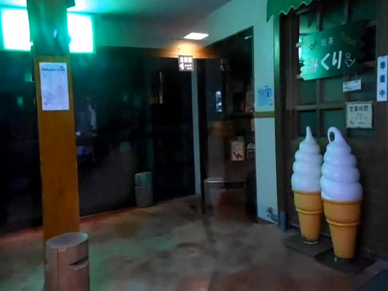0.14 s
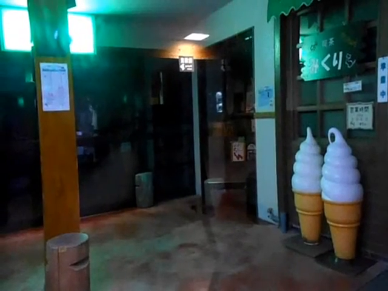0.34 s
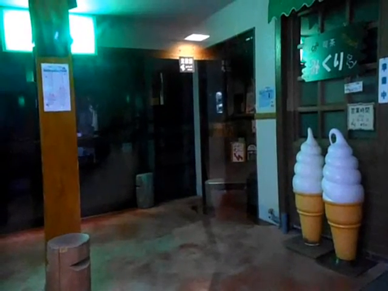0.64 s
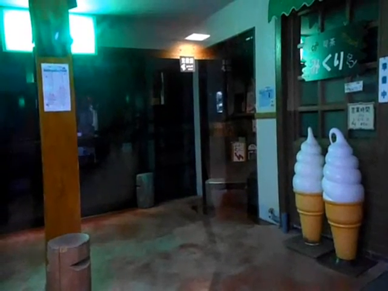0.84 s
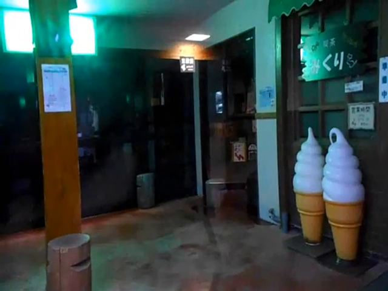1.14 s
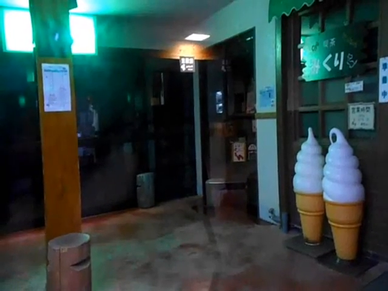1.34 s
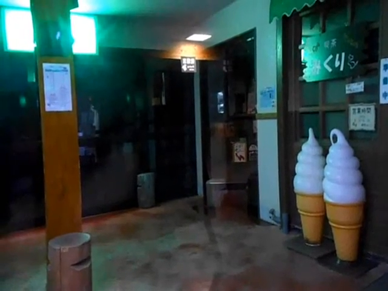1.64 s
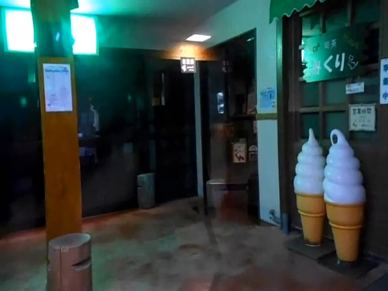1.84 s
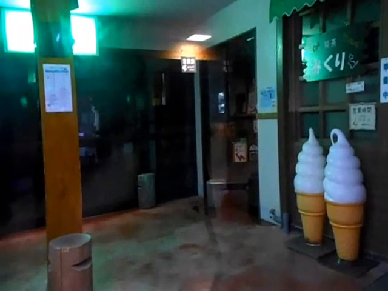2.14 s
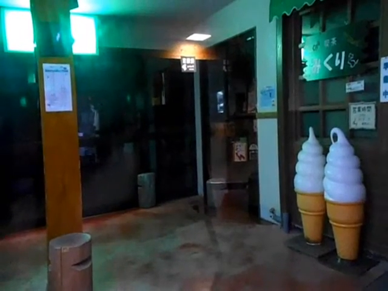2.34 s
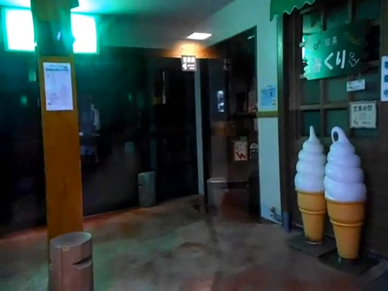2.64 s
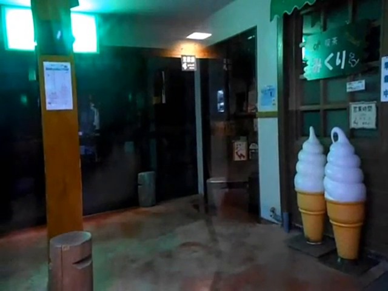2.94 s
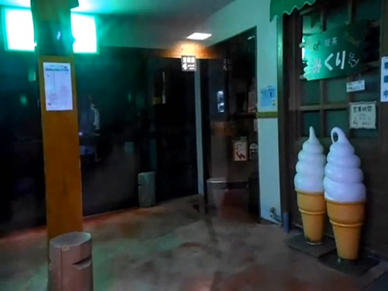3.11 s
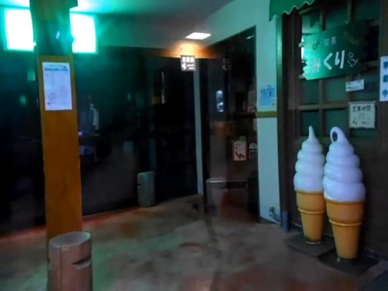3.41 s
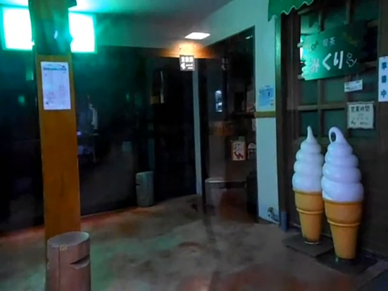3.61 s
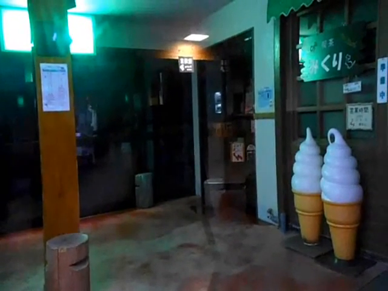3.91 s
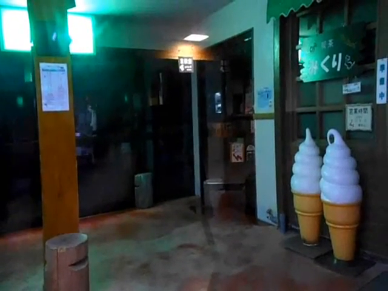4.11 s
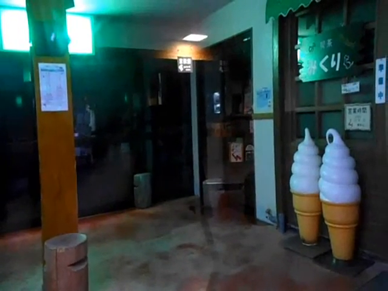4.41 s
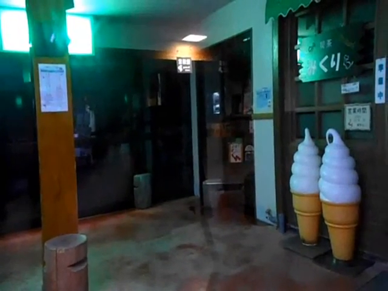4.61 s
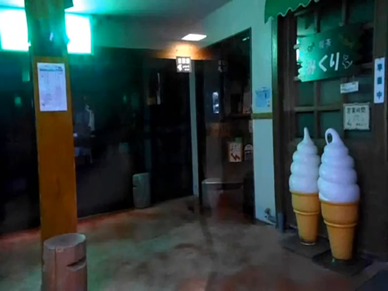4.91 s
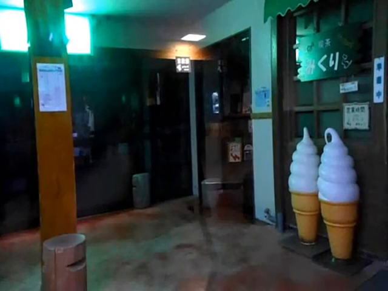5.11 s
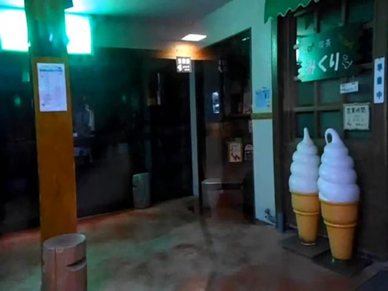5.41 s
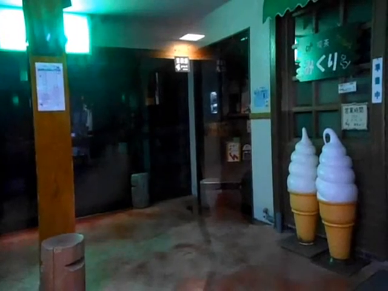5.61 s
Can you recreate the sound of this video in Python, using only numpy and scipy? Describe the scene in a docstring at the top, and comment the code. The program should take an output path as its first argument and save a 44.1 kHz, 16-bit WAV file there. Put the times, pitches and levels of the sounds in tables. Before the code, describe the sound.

Storm wind roars and buffets the microphone in gusts, with a low rumble, hiss, thin whistles and scattered rattles of loose fittings.

```python
"""Covered entrance of a building in storm wind, heard through one buffeted microphone.
The air roars and hisses, the eaves moan, a gap whistles in steps and spray slaps nearby.
Loose fittings knock, ring and shake a panel; a light metal part taps.
Eddies rumble and thump on the microphone; one big pressure swing overloads it just before a short lull."""
import sys
import numpy as np
from scipy import signal
from scipy.fft import rfft, irfft, next_fast_len
from scipy.io import wavfile
from scipy.ndimage import uniform_filter1d, map_coordinates

SR = 44100
rng = np.random.default_rng(int(sys.argv[2]) if len(sys.argv) > 2 else 0)


def store_pcm(level_fs):
    """Save levels as 16-bit WAV."""
    pcm = np.round(np.clip(level_fs, -1, 1) * 32767).astype(np.int16)
    wavfile.write(sys.argv[1], SR, np.atleast_2d(pcm).T)


N = 253575
TIME_S = np.arange(N) / SR

# modes of a loose fitting: freq_hz, width_hz, gain_db
FITTING_MODES = [(990, 480, -2), (1764, 170, 6), (2330, 420, 4), (2730, 510, 5.5), (3800, 360, 0.5),
                 (5040, 880, -9.5), (7560, 1700, -22)]


def amp(db):
    """Decibels to gain."""
    return 10 ** (np.asarray(db) / 20)


def unit(x):
    """Scale to rms 1."""
    return x / np.sqrt(np.mean(x ** 2) + 1e-20)


def curve(points):
    """(time_s, value) points to one value per sample."""
    return np.interp(TIME_S, *np.transpose(points))


def wobble(rate_hz):
    """Smooth random curve, rate_hz knots a second."""
    knots = rng.standard_normal(int(N * rate_hz / SR) + 4)
    return map_coordinates(knots, [TIME_S * rate_hz])


def rough_noise(depth_db, rate_hz):
    """White noise with a flickering level."""
    return rng.standard_normal(N) * amp(depth_db * wobble(rate_hz))


def filtered(x, response):
    """Apply response(freq_hz) by FFT."""
    size = next_fast_len(N + SR // 2)
    return irfft(rfft(x, size) * response(np.fft.rfftfreq(size, 1 / SR)), size)[:N]


def coloured(x, spectrum):
    """Shape x by (freq_hz, gain_db) points on a log axis; rms 1."""
    freq_hz, gain_db = np.transpose(spectrum)
    return unit(filtered(x, lambda hz: amp(np.interp(np.log(hz + 1), np.log(freq_hz + 1), gain_db))))


def resonate(x, modes):
    """Pass x through (freq_hz, width_hz, gain_db) resonances of alternating sign; rms 1."""
    def response(hz):
        return sum((-1) ** k * amp(db) * 1j * hz * width_hz / (mode_hz**2 - hz**2 + 1j * hz * width_hz)
                   for k, (mode_hz, width_hz, db) in enumerate(modes))
    return unit(filtered(x, response))


def turbulence(patch_db):
    """White noise with patches of random gain in time and frequency."""
    bins = signal.stft(rng.standard_normal(N), nperseg=1024)[2]
    patches = uniform_filter1d(rng.standard_normal(bins.shape), size=5, axis=0)
    patches = uniform_filter1d(patches, size=9, axis=1)
    return signal.istft(bins * amp(patch_db * unit(patches)), nperseg=1024)[1][:N]


def burst(peak_s, rise_s, t60_s):
    """Envelope: exponential rise to peak_s, then decay."""
    t = TIME_S - peak_s
    return np.exp(np.minimum(t, 0) / rise_s - np.log(1000) * np.maximum(t, 0) / t60_s)


def snap(start_s, modes, pitch_ratio=1, damping_ratio=.45):
    """One hard contact rings the modes; a part that bounces clear is damped less than one that scrapes."""
    t = np.arange(SR // 20) / SR
    ring = np.zeros(len(t))
    for mode_hz, width_hz, db in modes:
        pitch_hz = pitch_ratio * mode_hz * (1 + .015 * rng.standard_normal())
        decay = np.exp(-np.pi * damping_ratio * width_hz * t)
        ring += amp(db) * decay * np.sin(2 * np.pi * pitch_hz * t)
    return np.pad(ring, (round(start_s * SR), N))[:N]


def edge_tones(notes, width_hz, waver, arch):
    """Air over an edge sounds breathy notes; each slides and arches in pitch as it swells and fades."""
    out = np.zeros(N)
    breath = wobble(width_hz) + 1j * wobble(width_hz)
    flow = 1 + waver * wobble(90)  # pitch trembles with the flow
    for centre_s, length_s, pitch_hz, slide_hz_per_s, db in notes:
        near = np.abs(TIME_S - centre_s) < length_s
        t = TIME_S[near] - centre_s
        u = t / length_s
        swell = np.exp(-np.abs(u / .58) ** 3)
        freq_hz = (pitch_hz + slide_hz_per_s * t) * flow[near] * (1 - arch * u * u)
        out[near] += amp(db) * swell * np.real(breath[near] * np.exp(2j * np.pi * np.cumsum(freq_hz) / SR))
    return out


def far_rattle(hiss_db, count=45):
    """Small loose things further off chatter at random, harder when the wind is up."""
    force = sum(amp(8 * size) * burst(when * N / SR, rise_s=.002, t60_s=.12)
                for when, size in rng.random((count, 2)))
    return amp(hiss_db - 10) * resonate(rng.standard_normal(N) * force, FITTING_MODES)


def clinks():
    """A light metal part gives a ringing tap, then jingles briefly."""
    # taps: start_s, level_db
    hits = [(.78, -55), (.921, -59), (1.172, -66), (2.515, -56.5), (2.738, -56), (2.803, -56),
            (2.842, -44.5), (2.891, -53), (2.948, -56), (3.017, -41.5), (3.05, -64), (3.512, -44),
            (5.515, -49)]
    # modes of the part: freq_hz, width_hz, gain_db
    metal_modes = [(2820, 310, 4.5), (3440, 500, 3), (5300, 1100, -11), (6900, 510, -11), (7780, 410, -9)]
    taps = sum(amp(db - 5) * snap(s, metal_modes) for s, db in hits)
    jingle = sum(amp(db - 2) * burst(s, rise_s=.002, t60_s=.34) for s, db in hits)
    return taps + jingle * resonate(rough_noise(1.7, 200), metal_modes)


def spray():
    """Sheets of drops land in short bright splashes."""
    # splashes: peak_s, level_db, rise_s, t60_s
    splashes = [(1.612, -50, 0.0044, 0.45), (1.722, -54, 0.012, 0.18), (2.283, -64, .008, 0.14),
                (3.275, -46, .004, 0.17), (3.916, -36, 0.012, 0.23), (5.695, -43, 0.059, 0.55)]
    # splash spectrum: freq_hz, gain_db
    spectrum = [(1500, -2.5), (3000, -0.5), (5000, -4), (6300, -8.5), (7700, -9), (8700, -12.5),
                (10300, -16.5)]
    flow = sum(amp(db - .5) * burst(s, rise_s, t60_s) for s, db, rise_s, t60_s in splashes)
    return flow * coloured(rough_noise(2.3, 500), spectrum)


def gap_whistle():
    """Each puff through a narrow gap sounds one note; harder puffs carry more halo of hiss."""
    # puffs: centre_s, length_s, pitch_hz, slide_hz_per_s, level_db
    notes = [(1.33, .07, 5600, 3500, -57.5), (1.42, .07, 6080, 0, -58), (1.49, .08, 5480, -1800, -52),
             (1.63, .12, 5640, 0, -55), (2.14, .09, 5160, -1000, -54), (3.15, .08, 5270, -1200, -47),
             (3.25, .06, 5480, 3003, -48), (3.33, .08, 5580, 1, -47), (3.39, .08, 5800, 2, -54),
             (3.43, .07, 5300, -2000, -48), (3.52, .05, 4980, 2, -52), (3.67, .12, 5180, -600, -48.5),
             (3.85, .1, 5430, 2500, -46), (3.973, .07, 5960, 0, -49), (4.02, .08, 5410, 0, -45.5),
             (4.12, .11, 6490, 0, -48), (4.19, .08, 6000, -4000, -52), (4.25, .1, 5420, -1500, -48),
             (4.42, .15, 5380, -1200, -46.5), (4.735, .1, 6590, -1800, -49), (4.8, .14, 6220, 0, -52),
             (4.87, .08, 6470, 0, -50), (5.02, .18, 7070, 200, -45), (5.35, .2, 6020, -800, -51),
             (5.55, .11, 5500, -800, -47), (5.63, .07, 6130, 4005.5, -51)]
    loudest_db = max(note[-1] for note in notes)
    halo_notes = [(s, 1.5 * length_s, hz, slide, loudest_db + 1.2 * (db - loudest_db))
                  for s, length_s, hz, slide, db in notes]
    core = edge_tones(notes, width_hz=160, waver=.007, arch=.01)
    halo = edge_tones(halo_notes, width_hz=800, waver=.01, arch=.03)
    return amp(-8) * core + amp(-12.5) * halo


def eaves_moan():
    """Air round the eaves moans low and hollow, half lost in the roar."""
    # moans: centre_s, length_s, pitch_hz, slide_hz_per_s, level_db
    notes = [(.14, 0.16, 387, -77, -49.5), (1.79, .14, 265, -100, -36), (2.12, 0.13, 365, 109, -36),
             (3.85, 0.39, 270, -2, -39.5), (4.27, 0.15, 350, 149, -30.5), (4.42, .14, 380, 243, -32.5),
             (4.96, .14, 625, 402, -38), (4.97, 0.45, 305, 2.5, -46), (5.68, 0.14, 565, 0, -42)]
    return edge_tones(notes, width_hz=95, waver=.05, arch=.022)


def rattles(panel_lag_s=.0073, echo_db=-8.5):
    """Loose fittings knock: a snap, a scrape and a short ring, trailed by a shaken panel's clatter."""
    # knocks: start_s, contact_db, clatter_db, ring_db, ring_hz
    knocks = [(1.064, -45, -59, -47, 1810), (1.101, -45, -66, -50, 1830), (1.604, -35, -47, -46, 1700),
              (1.714, -36, -50, -46, 1780), (1.72, -40, -54, -44, 1900), (1.728, -33.5, -57, -32, 1920),
              (1.761, -46, -53, -46, 1880), (1.801, -50, -54, -39, 1840), (2.2715, -27, -44.5, -36, 1907),
              (2.2782, -32.5, -48, -45, 1950), (3.026, -46, -48, -40.5, 1710),
              (4.559, -36, -46.5, -40, 1780), (4.564, -38, -51, -45, 1780), (4.64, -36, -54, -45, 1745),
              (4.766, -44, -54, -38, 1790), (4.9335, -28, -37.5, -42, 1850), (4.975, -39, -53, -49, 1930),
              (5.089, -32, -41.5, -43, 1932), (5.101, -33, -51, -34.5, 1860),
              (5.1415, -25, -41.5, -47, 1900), (5.293, -35, -44.5, -41, 1820), (5.641, -46, -49, -38, 1705)]
    # panel modes: freq_hz, width_hz, gain_db
    panel_modes = [(1750, 200, 5), (2700, 380, 3.5), (3350, 510, 2), (3770, 550, -0.5), (5250, 1270, -10)]
    mean_hz = np.mean([knock[-1] for knock in knocks])
    # pitch varies with the spot that is hit
    out = sum(amp(db - 8) * snap(s, FITTING_MODES, hz / mean_hz) for s, db, _, _, hz in knocks)
    scrape = resonate(rough_noise(2, 300), FITTING_MODES)
    clatter = resonate(rough_noise(2, 300), panel_modes)
    # close modes beat and blur the pitch
    beating = np.exp(1j * (1.2 * wobble(380) + wobble(60))) * amp(2 * wobble(250))
    for s, contact_db, clatter_db, ring_db, ring_hz in knocks:
        ring = np.real(beating * np.exp(2j * np.pi * ring_hz * TIME_S))
        direct = burst(s, rise_s=.0005, t60_s=.08)
        echo = amp(echo_db) * burst(s, rise_s=.001, t60_s=.81)  # lingers in the entrance
        out += amp(contact_db - 7.5) * burst(s, rise_s=.0003, t60_s=.05) * scrape
        out += amp(clatter_db) * burst(s + panel_lag_s, rise_s=.0028, t60_s=.39) * clatter
        out += amp(ring_db - 2.5) * (direct + echo) * ring
    return out


def hiss(level_db):
    """Wind hiss, made grainy by driven drops; a fizz on top brightens strong gusts."""
    # hiss spectrum: freq_hz, gain_db
    hiss_spectrum = [(700, -25.5), (1500, 2.5), (2300, 1.5), (2850, 4), (3600, 0), (4300, -4.5),
                     (5500, -5.5), (6600, -12.5), (8000, -14.5), (9000, -24.5), (10300, -24.5)]
    # fizz spectrum: freq_hz, gain_db
    fizz_spectrum = [(3000, -29.5), (5000, 1), (6500, 1), (8000, -6), (9000, -10), (10300, -10.5)]
    drops = rng.standard_normal(N) * amp(1.6 * rng.standard_normal(N))
    body = coloured(turbulence(patch_db=1) + .5 * drops, hiss_spectrum)
    body_db = level_db + .22 + .17 * wobble(37)
    fizz = coloured(turbulence(patch_db=3), fizz_spectrum)
    fizz_db = 3.3 * (level_db + 48) - 62.5
    return amp(body_db) * body + amp(fizz_db) * fizz


def roar(wind_db):
    """Turbulent wind round the building makes a dark roar."""
    # roar spectrum: freq_hz, gain_db
    spectrum = [(120, -51), (250, 4), (370, -1.5), (480, 2), (720, 1), (850, 2), (1100, 0), (1300, -5),
                (1550, -12.5), (1800, -14), (2100, -18.5), (3000, -26.5), (5000, -36.5), (9000, -69.5)]
    return coloured(turbulence(patch_db=1), spectrum) * amp(wind_db + .49 + .11 * wobble(25))


def thumps(lag_s=.00621):
    """An eddy's low-pressure core passes the microphone: a suck, then a rebound."""
    # eddies: time_s, level_db, half_width_s
    eddies = [(0.557, -23, 0.0072), (0.847, -13.5, 0.01), (1.609, -19, 0.0015), (1.786, -19, 0.0018),
              (2.034, -16, 0.0015), (2.282, -5, .0012), (2.942, -12, 0.0013), (3.247, -22, 0.0016),
              (3.265, -15.5, 0.0017), (3.319, -18.5, 0.0012), (3.356, -12.5, 0.0012),
              (3.789, -10.5, 0.0011), (3.952, -14, 0.0014), (4.077, -14, .0012), (4.296, -12, 0.0036),
              (4.827, -14, 0.0013), (4.97, -11.5, .0012), (5.145, -6.5, 0.0013), (5.205, -14.5, 0.00088),
              (5.321, -15.5, 0.0016), (5.451, -12.5, 0.0011)]
    out = np.zeros(N)
    for time_s, db, half_width_s in eddies:
        u = (TIME_S - time_s - lag_s) / half_width_s
        out += amp(db - 2) * (u * u + .5 * u - 1) * np.exp(-u * u / 2)
    return out


def buffeting(wind_db):
    """Air on the microphone: a deep rumble, the boom of the entrance and a lumpy flutter."""
    # wind that reaches the microphone: time_s, level_db
    draught = [(0, -40), (.42, -42), (.6, -39.5), (.87, -32), (1.1, -35), (1.55, -33.5), (1.7, -30),
               (2.2, -33.5), (2.3, -21), (2.55, -49.5), (2.78, -38), (2.98, -29), (3.3, -29), (3.72, -35.5),
               (3.95, -27), (4.4, -38), (4.7, -28), (5.2, -28), (5.75, -30.5)]
    # rumble spectrum: freq_hz, gain_db
    rumble_spectrum = [(20, 2), (28, 9.5), (40, 5), (70, -1), (115, -3.5), (170, -14), (300, -29),
                       (600, -90)]
    # entrance modes: freq_hz, width_hz, gain_db
    entrance_modes = [(72.7, 10.7, 1), (101.1, 6.2, 0.5), (145, 10.2, -0.5), (230, 54, -18.5)]
    # flutter spectrum: freq_hz, gain_db
    flutter_spectrum = [(60, -42.5), (120, -4.5), (165, -5.5), (240, 1.5), (300, -3), (380, -6.5),
                        (460, -12.5), (650, -23.5), (1300, -71)]
    draught_db = curve(draught)
    rumble = amp(draught_db + 3.5) * coloured(rough_noise(1, 14), rumble_spectrum)
    boom = amp((draught_db + wind_db) / 2 + 2.25) * resonate(rng.standard_normal(N), entrance_modes)
    lumps = turbulence(patch_db=.36) * amp(1.8 * wobble(60))
    flutter = amp(wind_db + 3.42) * coloured(lumps, flutter_spectrum)
    return rumble + boom + flutter


def pressure_swing():
    """Eddies of even strength and uneven spacing slowly heave the pressure at the microphone."""
    # swing depth: time_s, level_db
    depth = [(0, -16), (.62, -25.5), (.9, -21), (1.55, -19.5), (1.72, -26.5), (2.22, -20), (2.36, -10),
             (2.74, -33.5), (3.35, -18.5), (3.6, -26), (4.0, -21.5), (5.75, -29.5)]
    # eddy spectrum: freq_hz, gain_db
    spectrum = [(3, -18.5), (7, -6.5), (12, 3.5), (16, -9), (22, -11.5), (32, -20.5), (60, -67),
                (150, -120)]
    phase = np.angle(signal.hilbert(coloured(rng.standard_normal(N), spectrum)))
    swing = coloured(np.cos(phase), spectrum=[(25, 6), (45, -36.5), (110, -68)])
    return amp(curve(depth) + 2) * swing


def overload_ticks(relax_s=.0042):
    """The overloaded microphone's output jumps in small steps that relax away."""
    # jumps: start_s, level_db
    jumps = [(0.079, -31.5), (0.0894, -34), (2.33, -35), (2.3425, -32), (2.3653, -27.5), (2.3715, -45),
             (2.3888, -40), (2.413, -36), (2.423, -30.5), (2.435, -35), (2.4583, -36), (2.4703, -34),
             (2.554, -43)]
    impulses = np.zeros(N)
    for start_s, db in jumps:
        impulses[round(start_s * SR)] = amp(db + 4)
    return signal.lfilter([1], [1, -np.exp(-1 / (relax_s * SR))], impulses)


def scene():
    """Mono sum; roar, hiss, flutter, boom and far rattle follow the wind's strength."""
    # wind strength round the building: time_s, level_db
    wind = [(0, -44), (.13, -50.5), (.42, -50.5), (.88, -44), (1.25, -47), (1.54, -46), (1.78, -41),
            (2.0, -40), (2.27, -36.5), (2.52, -56), (2.68, -52), (2.95, -42), (3.27, -38.5), (3.62, -38.5),
            (3.82, -35), (5.12, -35), (5.38, -40.5), (5.75, -36.5)]
    wind_db = curve(wind)
    gust_db = wind_db + 40.5  # relative to steady wind
    hiss_db = -51.5 + .95 * gust_db
    microphone = pressure_swing() + buffeting(wind_db) + thumps()
    air = roar(wind_db) + hiss(hiss_db) + gap_whistle() + eaves_moan()
    building = rattles() + clinks() + far_rattle(hiss_db)
    return (microphone + air + building + spray())[None]


def record(dry):
    """The microphone rounds off the largest swings; overload ticks sound on top; all is low-passed."""
    ceiling, cutoff_hz = .45, 10450
    rounded = dry[0] / (1 + (dry[0] / ceiling) ** 8) ** (1 / 8)
    return filtered(rounded + overload_ticks(), lambda hz: 1 / (1 + (hz / cutoff_hz) ** 90))[None]


dry = scene()
out = record(dry)
store_pcm(out)
```